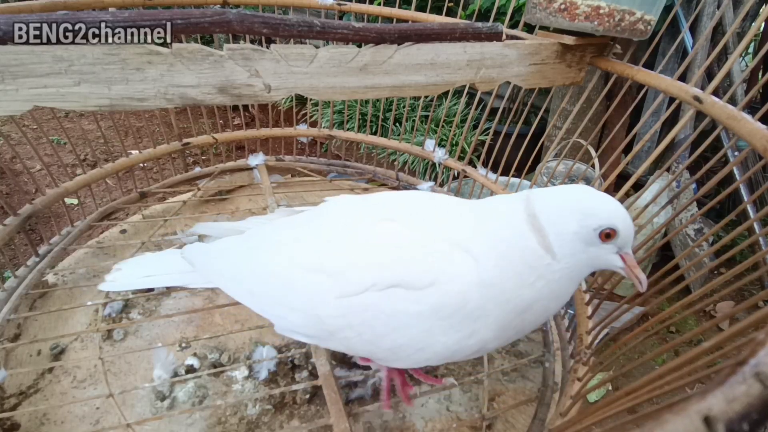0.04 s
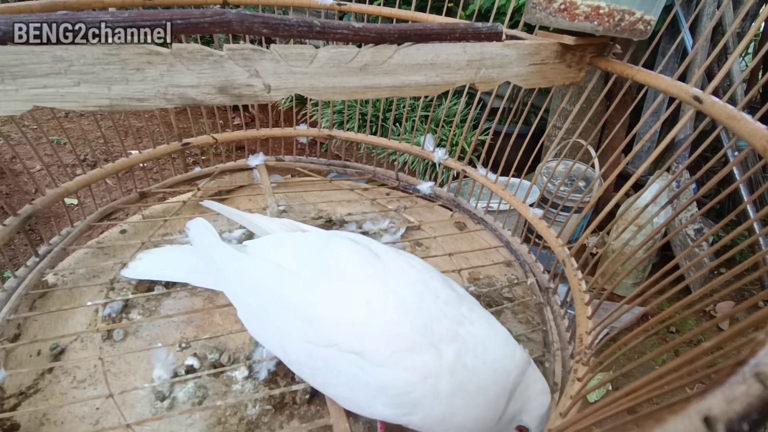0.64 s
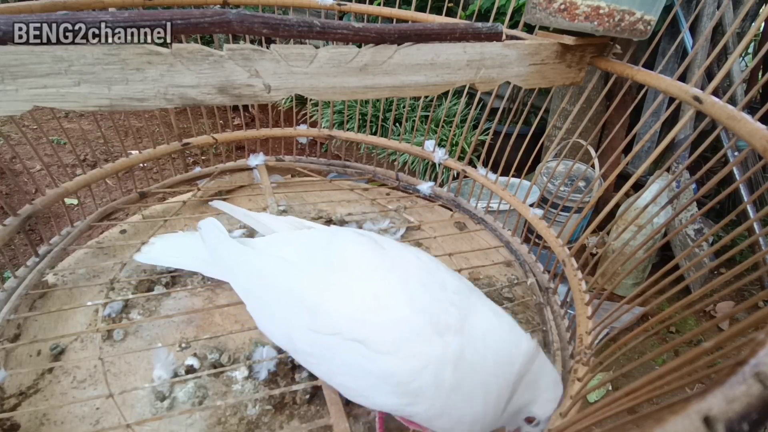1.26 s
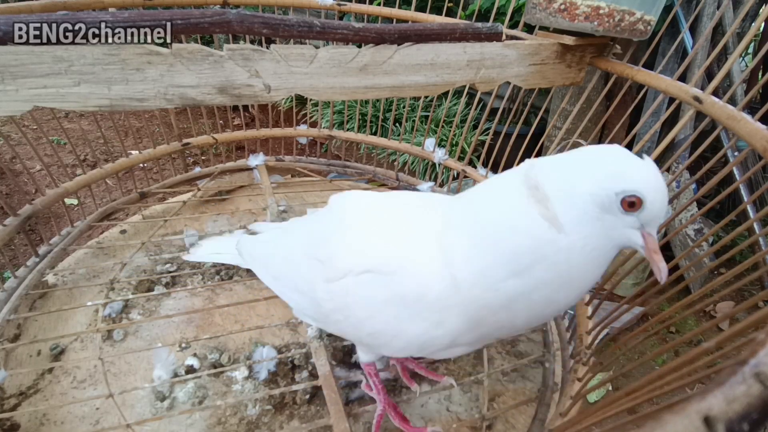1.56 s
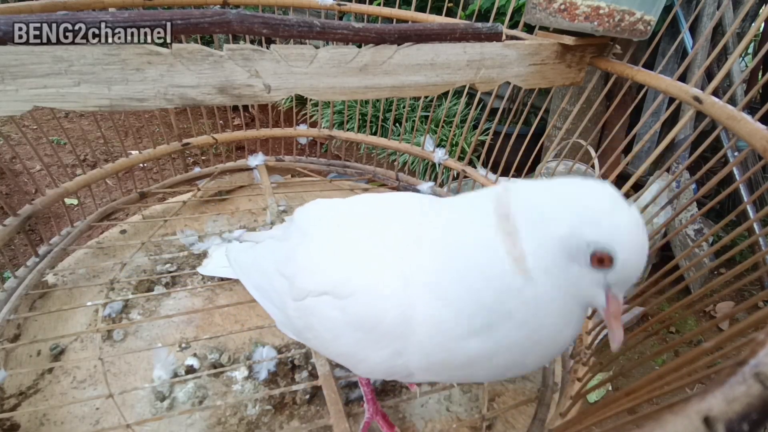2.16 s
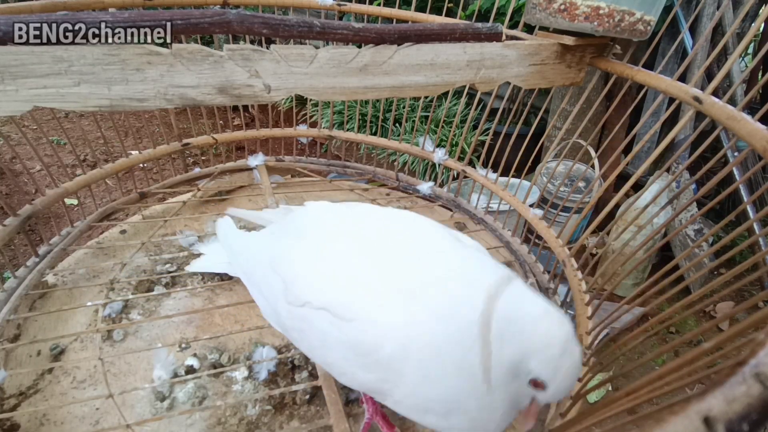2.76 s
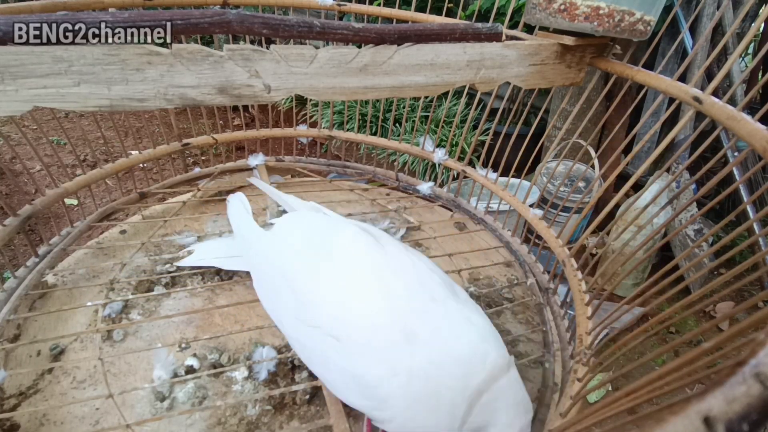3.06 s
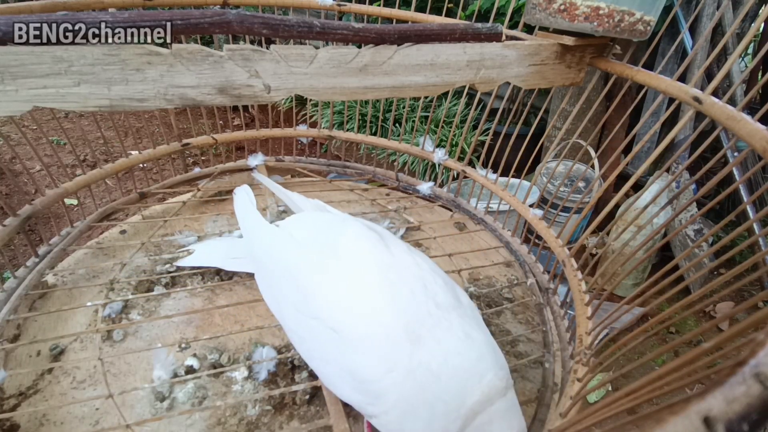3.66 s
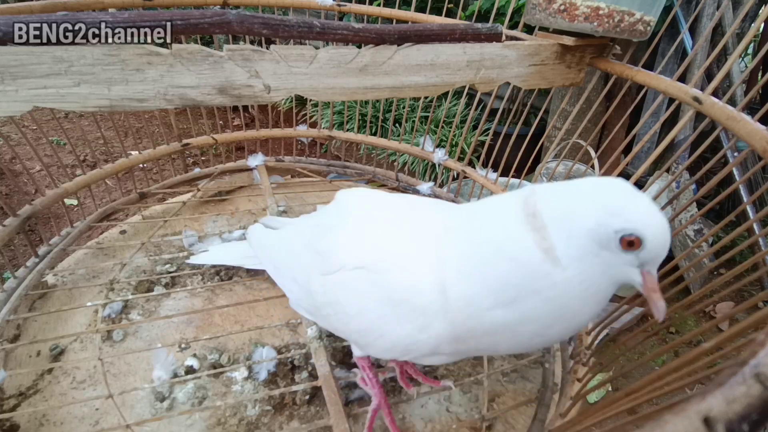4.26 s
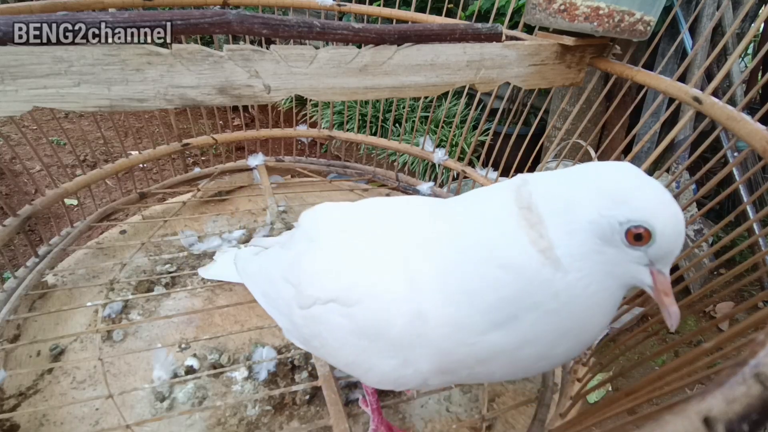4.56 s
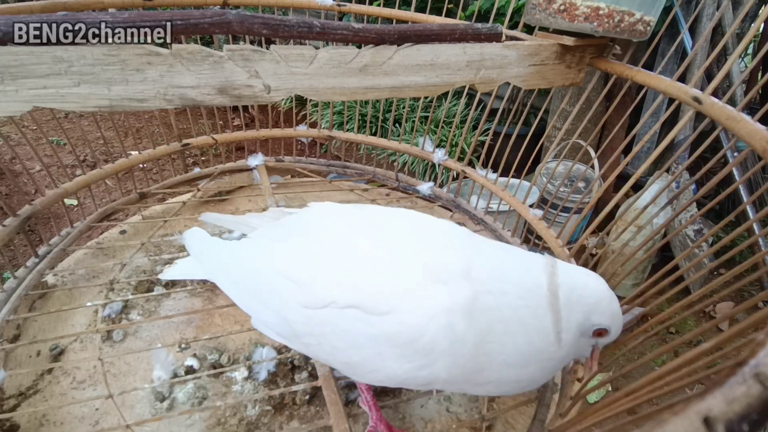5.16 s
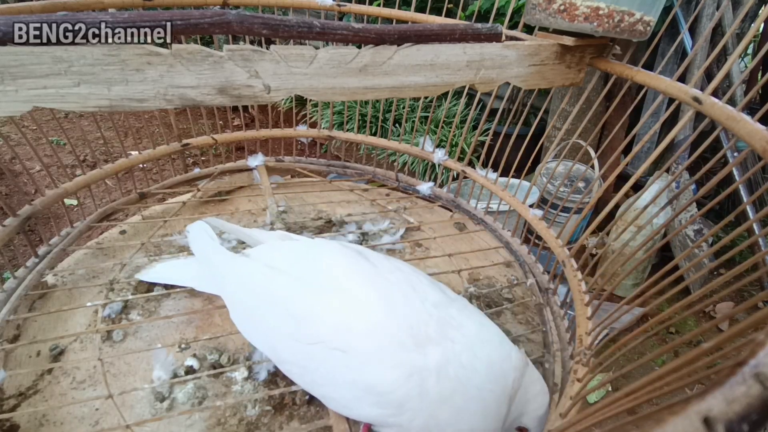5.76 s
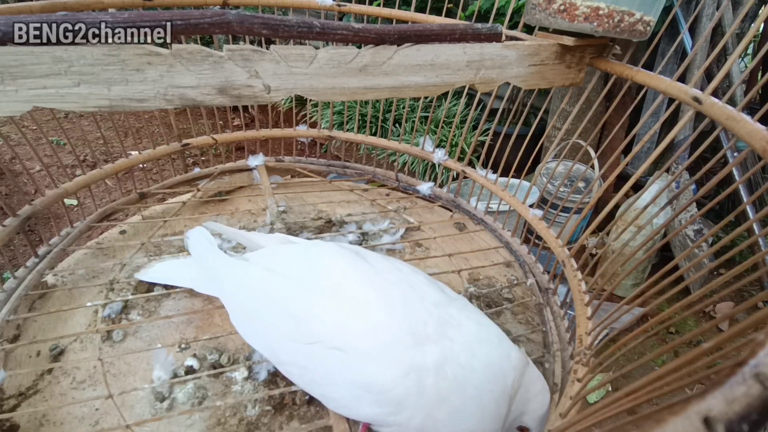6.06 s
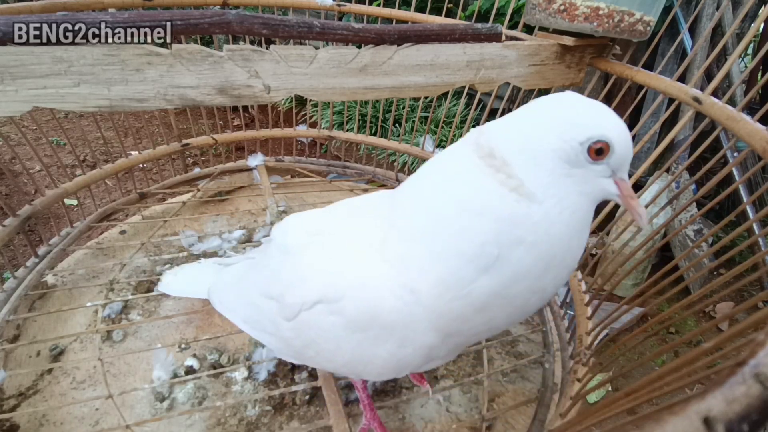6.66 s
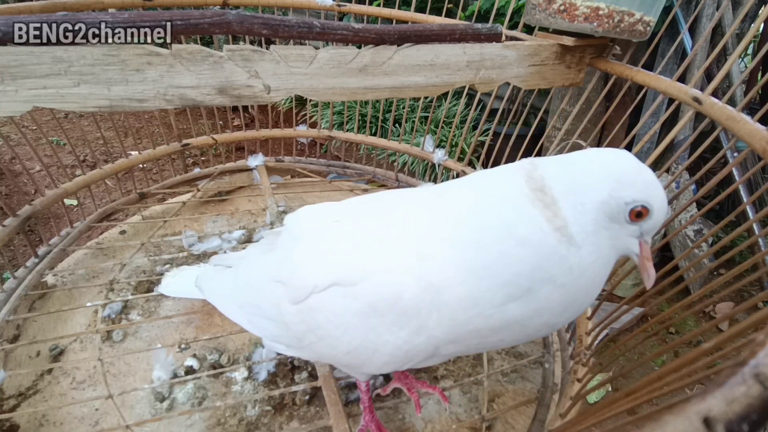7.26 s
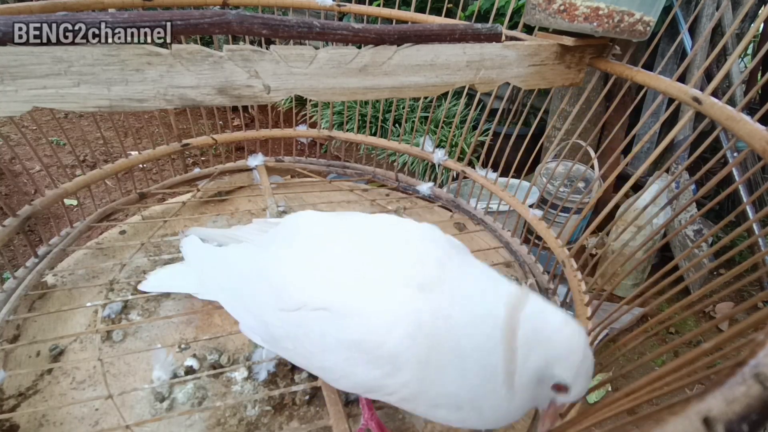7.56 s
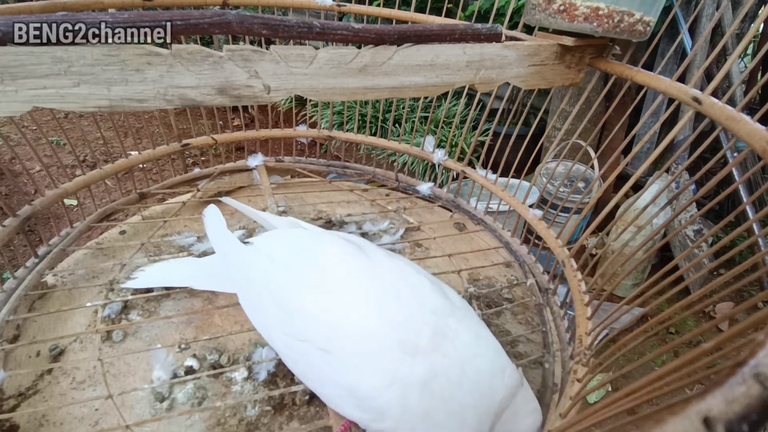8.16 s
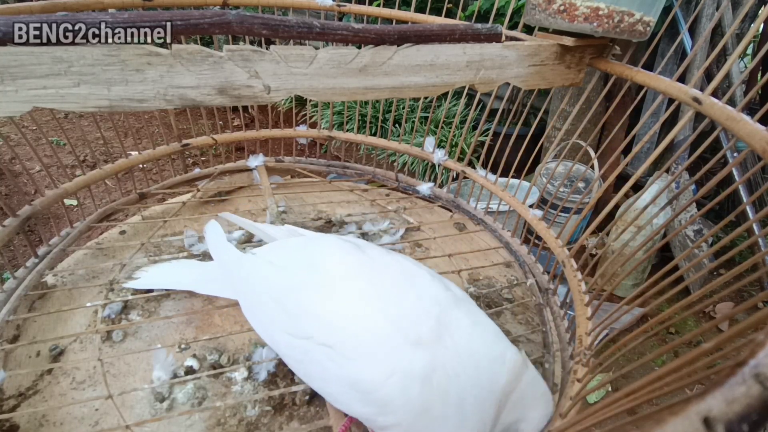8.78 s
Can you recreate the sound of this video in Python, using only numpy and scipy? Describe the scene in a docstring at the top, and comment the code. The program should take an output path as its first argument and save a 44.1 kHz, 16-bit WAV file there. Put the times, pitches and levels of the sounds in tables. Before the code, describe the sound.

A dove coos close to the microphone in a quiet yard. Each phrase has a short coo, a pulsing trill that slows and swells, and a long falling coo, with a low growl opening the later ones. Three phrases finish and a fourth reaches its trill. Claws and beak tick against the cane cage and feathers rustle faintly over a low outdoor rumble.

```python
"""A caged dove bows and coos close to the microphone in a quiet yard.
A full phrase is a low growl, a short coo, a trill that slows and swells, and a long falling coo.
The voice is a source and a filter: the inflated crop shapes the harmonics of the syrinx into coos,
and slow pulses ring the throat in growls. Claws excite the modes of the cane cage, feathers rustle
by friction, and nearby boards and walls return short echoes over a low outdoor rumble."""
import sys
import numpy as np
from scipy import signal
from scipy.fft import rfft, irfft, next_fast_len
from scipy.io import wavfile
from scipy.ndimage import uniform_filter1d, map_coordinates

SR = 44100
rng = np.random.default_rng(int(sys.argv[2]) if len(sys.argv) > 2 else 0)


def dump_mix(stems):
    """Bounce the given channels to the path in sys.argv[1] as a 16-bit WAV at rate SR."""
    frames = np.atleast_2d(stems).T  # one column per channel
    limited = np.clip(frames, -1, 1)  # hard clip at full scale
    pcm = np.round(limited * 32767).astype(np.int16)
    wavfile.write(sys.argv[1], SR, pcm)


N = 388962
BAND_LIMIT_HZ = 15700


def amp(db):
    """Decibels to amplitude ratio."""
    return 10 ** (np.asarray(db) / 20)


def unit(x):
    """Normalisation to rms 1."""
    return x / np.sqrt(np.mean(x ** 2) + 1e-20)


def along(points, hz):
    """Interpolation of (frequency_hz, value) points on a logarithmic frequency axis."""
    f, v = np.transpose(points)
    return np.interp(np.log(hz + 1), np.log(f + 1), v)


def stretch(rows):
    """Linear interpolation of (time_s, values...) rows: the sample times, then each column."""
    s, *cols = np.transpose(rows)
    t = np.arange(round(s[0] * SR), round(s[-1] * SR)) / SR
    return [t] + [np.interp(t, s, c) for c in cols]


def progress(t, start, end):
    """Linear ramp from 0 at start to 1 at end."""
    return np.clip((t - start) / (end - start), 0, 1)


def switch(t, at_s, width_s):
    """Sigmoid step from 0 to 1."""
    return (1 + np.tanh((t - at_s) / width_s)) / 2


def wobble(t, rate):
    """Smooth random modulation with rate knots a second."""
    return map_coordinates(rng.standard_normal(4096), [t * rate], mode="wrap")


def taper(x):
    """Raised-cosine ramp as x goes from 0 to 1."""
    return np.sin(np.pi / 2 * np.clip(x, 0, 1)) ** 2


def fade(t, rise_s, fall_s):
    """Amplitude envelope tapered at both ends."""
    return taper((t - t[0]) / rise_s) * taper((t[-1] - t) / fall_s)


def filtered(x, response):
    """Linear filtering: the spectrum of x times a frequency response."""
    n = x.shape[-1]
    padded = next_fast_len(n + 8192)
    return irfft(rfft(x, padded) * response(np.fft.rfftfreq(padded, 1 / SR)), padded)[..., :n]


def noise(spectrum, n):
    """Two uncorrelated channels of coloured noise, rms 1."""
    return unit(filtered(rng.standard_normal((2, n)), lambda hz: amp(along(spectrum, hz))))


def add(track, start_s, sound):
    """Superposition of a sound on the track."""
    part = track[..., max(round(start_s * SR), 0):][..., :sound.shape[-1]]
    part += sound[..., :part.shape[-1]]


def off_axis(pair, crossfeed=.4):
    """Arrival-time difference: a sound off to one side is alike in both channels, later at the left."""
    left, right = (pair + crossfeed * pair[::-1]) / np.hypot(1, crossfeed)
    return np.array([np.roll(left, rng.integers(2, 9)), right])


# Left-right likeness of the background: frequency_hz, correlation
COHERENCE = [(50, .92), (200, 0.84), (600, 0.7), (1600, 0.13), (5000, 0.84), (15000, 0.36)]
def air(spectrum):
    """Partial coherence: mid and side noise mix to a stereo field of rms 1, nearly mono in the bass."""
    def weights(hz):
        angle = np.arccos(np.clip(along(COHERENCE, hz), -1, 1)) / 2
        return np.array([np.cos(angle), np.sin(angle)])
    mid, side = filtered(noise(spectrum, N), weights)
    return unit(np.array([mid + side, mid - side]))


# Spectra of the outdoor rumble and hiss: frequency_hz, density_db
RUMBLE_SPECTRUM = [(20, -39), (38, -23), (52, -1.5), (75, -9), (110, -0.5), (210, -3.5), (290, -8),
                   (500, -11.5), (900, -23), (2000, -48)]
HISS_SPECTRUM = [(300, -11.5), (800, -4), (1450, -2.5), (1750, 3.5), (2050, -1), (3200, -7.5),
                 (5000, -16.5), (9000, -21), (15300, -26.5)]
def yard(rumble_db=-45, rumble_drift_db=-6.5, hiss_db=-60, hiss_drift_db=-2, whine_hz=4085, whine_db=-86):
    """Ambient noise floor: rumble and hiss slowly subside while a thin whine comes and goes."""
    t = np.arange(N) / SR
    elapsed = t / t[-1]
    rumble = air(RUMBLE_SPECTRUM) * amp(rumble_db + rumble_drift_db * elapsed + .55 * wobble(t, 3.8))
    hiss = air(HISS_SPECTRUM) * amp(hiss_db + hiss_drift_db * elapsed + .31 * wobble(t, 1.1))
    whine = np.sin(2 * np.pi * whine_hz * t + 1.2 * wobble(t, 50))
    return rumble + hiss + whine * amp(whine_db + 4.5 * wobble(t, 1.7))


# Reverberation time around the cage: frequency_hz, t60_s
WALL_DECAY = [(200, 0.49), (600, 0.63), (2000, 0.48), (12000, 0.24)]
def walls(x):
    """Reverberation: diffuse reflections from the walls decay exponentially in each band."""
    hz, t, bands = signal.stft(rng.standard_normal((2, SR // 3)), SR, nperseg=256)
    decay = amp(-60 * t / along(WALL_DECAY, hz)[:, None])
    tail = signal.istft(bands * decay, SR, nperseg=256)[1]
    tail = tail + .4 * tail[::-1]
    return signal.fftconvolve(x, tail / np.linalg.norm(tail[0]), axes=1)[:, :N]


def boards(x, earliest_s=.002, spread_s=.011, count=8):
    """Early reflections: the cage floor and boards send different delayed copies to each channel."""
    taps = np.zeros((2, SR // 10))
    for side in taps:
        delays = (SR * (earliest_s + spread_s * rng.random(count))).astype(int)
        np.add.at(side, delays, rng.choice([-1, 1], count) / np.sqrt(count))
    return signal.fftconvolve(x, taps, axes=1)[:, :N]


# Spectrum of rubbing feathers: frequency_hz, density_db
FEATHER_SPECTRUM = [(500, -19), (1500, -0.5), (3000, 3.5), (5000, -4), (9000, -3), (12000, -13),
                    (15300, -13.5)]
# Strokes of feathers or feet along the cage: peak_s, rise_s, fall_s, level_db
STROKES = [(0.15, 0.18, 0.089, -59.5), (0.379, .06, .12, -58), (1.26, .07, .06, -59.5),
           (1.925, .035, 0.044, -50), (3.165, .055, 0.16, -48), (4.99, .07, .03, -59.5),
           (5.161, 0.033, .12, -59), (5.48, .1, .14, -53.5), (6.66, .04, .12, -57.5), (7.03, .03, .06, -60),
           (7.8, .12, .3, -60), (8.175, .1, .1, -51)]
def rustles(grain_db=4, catch_db=3, edge_db=-14):
    """Stick-slip friction: feathers catch and slip in uneven grains as each stroke swells and fades."""
    out = np.zeros((2, N))
    for peak, rise, fall, level_db in STROKES:
        t, swell_db = stretch([(peak - rise, edge_db), (peak, 0), (peak + fall, edge_db)])
        friction = noise(FEATHER_SPECTRUM, len(t))
        grains = unit(friction * amp(grain_db * wobble(t, 700) + catch_db * wobble(t, 73)))
        add(out, t[0], off_axis(grains) * amp(level_db + swell_db) * fade(t, .015, .014))
    return out * amp([[-1.5], [1.5]])


# Spectrum of a claw's contact: frequency_hz, density_db
CLAW_SPECTRUM = [(200, -14), (900, -7), (3000, -1), (6000, 0), (10000, -2), (12500, -5), (14500, -2)]
# Modes of the cane bars: frequency_hz, t60_s, level_db
CANE_MODES = [(1760, 0.038, 2), (2270, 0.069, -6), (2865, 0.046, -3.5), (3500, 0.027, -3)]
# Claws and beak striking the cage: time_s, level_db, relative_ring_db, left_minus_right_db
IMPACTS = [(0.37, -24.5, -12.5, 2.5), (0.4594, -40, 0.5, -6), (1.258, -40.5, -5, -16),
           (1.5077, -34.5, -16.5, -2), (1.9224, -37, -3, -12.5), (2.3182, -33, -9, -18.5),
           (2.5235, -42, 2.5, -1), (2.663, -43, -4, -2), (2.8282, -27.5, -15.5, -16.5),
           (3.1335, -22, -15.5, -5.5), (3.1817, -39, 3.5, 2), (3.2029, -32.5, -0.5, 5.5),
           (3.5995, -46.5, -12, -19.5), (4.3361, -36.5, 3.5, -2), (5.1383, -37.5, -11, -8.5),
           (5.2452, -19.5, -1.5, -5), (5.5049, -21.5, -14, -8), (6.5499, -40.5, 1, 5),
           (6.6542, -40.5, 0, -14), (7.0278, -31.5, -10, -5.5), (7.205, -42, 2, -12.5),
           (7.7682, -42, -11, 2.5), (8.061, -23, -17, -3.5), (8.1554, -33, -6, 0), (8.1908, -36.5, 1, -3.5),
           (8.334, -36.5, -2.5, -3.5), (8.3823, -36, -15, 1)]
def ticks(snap_gain_db=-8.5, ring_gain_db=-8, lead_s=.01, crack_t60_s=.026, rattle_t60_s=.15, count=45):
    """Impact excitation: a claw touches, cracks and rattles the bars, whose damped modes ring on."""
    out = np.zeros((2, N))
    t = np.arange(-round(lead_s * SR), SR // 6) / SR
    age = np.maximum(t, 0)
    struck = np.clip(t / .00009, 0, 1)
    touch = (t < 0) * amp(-20)
    envelope = touch + struck * (amp(-60 * age / crack_t60_s) + amp(-20 - 60 * age / rattle_t60_s))
    faint_impacts = [(when * N / SR, -57 + 8 * size, -6, -12 * side)
                     for when, size, side in rng.random((count, 3))]
    for time, level_db, ring_db, pan_db in list(IMPACTS) + faint_impacts:
        bright_db = .088 * max(level_db + 40.5, 0)  # harder blows are brighter
        spectrum = [(hz, db + bright_db * (hz / BAND_LIMIT_HZ) ** 2) for hz, db in CLAW_SPECTRUM]
        snap = noise(spectrum, len(t)) * envelope * amp(3 * wobble(t, 350))
        snap = off_axis(snap * np.linalg.norm(envelope) / np.linalg.norm(snap[0]))
        cane = sum(amp(db - 60 * age / t60) * np.sin(2 * np.pi * hz * age + wobble(t, 550))
                   for hz, t60, db in CANE_MODES)
        hit = amp(snap_gain_db) * snap + amp(ring_gain_db + ring_db) * cane * struck
        pan = amp([[pan_db / 2], [-pan_db / 2]])
        add(out, time - lead_s, hit * amp(level_db) * fade(t, .0037, .017) * pan)
    return out


# Resonances of the beak's thin whistle: centre_hz, width_hz, level_db
BEAK_RESONANCES = [(6100, 400, 0.5), (7300, 260, -4), (10000, 700, -5)]
def beak(f):
    """Resonance: the beak's frequency response is a sum of narrow peaks."""
    return sum(amp(db) / (1 + (2 * (f - hz) / width) ** 2) for hz, width, db in BEAK_RESONANCES)


# Air hissing through with each pulse: frequency_hz, density_db
BREATH_SPECTRUM = [(600, -30.5), (1100, -1), (1500, 0.5), (2100, -8.5), (3500, -22.5), (7000, -46)]
def rasp(t, rate_hz, throat_hz, rough, whistle_db=-45, t60_s=.022, jitter=.07, breath_db=-24):
    """Period doubling: syrinx pulses ring the throat; roughness weakens alternate ones and adds air."""
    cycles = np.cumsum(rate_hz * (1 + jitter * rough * wobble(t, 150))) / SR
    onsets = np.flatnonzero(np.diff(np.floor(cycles), prepend=-1))
    alternate = np.arange(len(onsets)) % 2
    strength = (1 - rough[onsets] * alternate) * amp(2.5 * rough[onsets] * wobble(t[onsets], 170))
    age = np.arange(SR // 30) / SR
    rings = strength[:, None] * np.sin(2 * np.pi * throat_hz[onsets, None] * age) * amp(-60 * age / t60_s)
    positions = onsets[:, None] + np.arange(len(age))
    pulses = np.bincount(positions.ravel(), rings.ravel())[:len(t)]  # overlapping rings add
    tissue = np.vstack([signal.butter(5, 915, fs=SR, output="sos"),
                        signal.butter(2, 245, "high", fs=SR, output="sos")])
    buzz = signal.sosfilt(tissue, pulses)
    buzz = buzz / np.sqrt(np.abs(uniform_filter1d(buzz ** 2, size=1100)) + 1e-9)  # even out the level
    airflow = uniform_filter1d(np.abs(buzz), size=90)  # air passes with each pulse
    whistle = unit(filtered(rng.standard_normal(len(t)), beak)) * amp(whistle_db)
    breath = noise(BREATH_SPECTRUM, len(t))[0] * amp(breath_db)
    return buzz + (whistle + breath) * airflow * rough


# Hoarse catches at both ends of a short coo: start_s, level_db
VOICE_CATCHES = [(0.51, -29.5), (0.75, -35.5), (3.234, -29.5), (3.477, -33.5), (5.557, -25.5),
                 (5.796, -36.5), (8.12, -25.5), (8.348, -34.5)]
def catches(length_s=.029, rate_hz=(310, 368), throat_hz=(470, 700), rough=.86):
    """Onset and offset transients: a few quick, rising pulses as the voice takes hold or lets go."""
    out = np.zeros(N)
    for start, level_db in VOICE_CATCHES:
        t, rate, throat = stretch([(start, rate_hz[0], throat_hz[0]),
                                   (start + length_s, rate_hz[1], throat_hz[1])])
        buzz = rasp(t, rate, throat, np.full(len(t), rough))
        add(out, start, buzz * amp(level_db) * fade(t, .013, .014))
    return out


# Low pulsed calls: start_s, climax_s, end_s, base_rate_hz, climax_throat_hz, opening_db, climax_db,
# relative_whistle_db
GROWL_CALLS = [(2.814, 3.094, 3.22, 183.8, 840, -32.5, -31.5, -44.5),
               (5.186, 5.431, 5.55, 204.3, 790, -30.5, -25.5, -46),
               (7.8, 7.964, 8.11, 217.5, 752, -28.5, -24.5, -33)]
def growls(rest_hz=545, throat_s=.1, climax_s=.04, quicken=.08, slacken=.2, fall_db=22, waver_db=2.5):
    """Formant glide: the throat resonance rises to a rough climax, then the pulses slacken and fade."""
    out = np.zeros(N)
    for start, climax, end, base_hz, top_hz, opening_db, climax_db, whistle_db in GROWL_CALLS:
        t, = stretch([(start,), (end,)])
        strain = np.exp(-((t - climax) / climax_s) ** 2)
        raised = np.exp(-((t - climax) / throat_s) ** 2)
        spent = progress(t, climax, end) ** 2.2
        tension = 1 - .08 * np.exp((start - t) / .055) + .03 * wobble(t, 30)  # starts flat, wanders
        rate_hz = base_hz * tension * (1 + quicken * raised - slacken * spent)
        throat_hz = rest_hz + (top_hz - rest_hz) * raised
        buzz = rasp(t, rate_hz, throat_hz, rough=.31 + .48 * raised ** 2, whistle_db=whistle_db)
        db = opening_db + (climax_db - opening_db) * strain - fall_db * spent + waver_db * wobble(t, 25)
        add(out, start, buzz * amp(db) * fade(t, .008, .005))
    return out


# Source spectrum of the syrinx: harmonic_number, upper_register_db, lower_register_db
SYRINX_HARMONICS = [(1, 1.5, 0.5), (2, -16.5, -11.5), (3, -25.5, -25.5), (4, -37, -31.5), (5, -43, -48),
                    (6, -48, -44.5), (10, -50, -63.5)]
# Transmission of the inflated crop: frequency_hz, gain_db
CROP_RESPONSE = [(280, -20), (385, -6.5), (440, 4), (500, 3), (620, -3), (770, -20), (880, -14.5),
                 (1020, -30.5), (1220, -21.5), (1500, -24.5), (1800, -11), (2050, -6.5), (2400, -11),
                 (4500, -29), (5700, -12), (6600, -26.5)]
def voice(pitch, lower=0, overtones_db=0):
    """Source and filter, rms 1: nearly a sine until the pitch sinks under the crop's resonance."""
    phase = 2 * np.pi * np.cumsum(pitch) / SR
    gains, waves = [], []
    for number, upper_db, lower_db in SYRINX_HARMONICS:
        k = round(number)
        source_db = upper_db + lower * (lower_db - upper_db) + overtones_db * (k > 1)
        gains.append(amp(source_db + along(CROP_RESPONSE, k * pitch)))
        waves.append(np.sin(k * phase))
    gains = np.array(gains)
    return np.sum(gains * waves, axis=0) / np.sqrt(np.sum(gains ** 2, axis=0) / 2)


def sung(t, pitch, db, lower=0, overtones_db=0, attack_s=.0066, release_s=.015):
    """Jitter and shimmer: a held note wavers slightly in pitch and level."""
    note = voice(pitch * (1 + .002 * wobble(t, 70)), lower, overtones_db)
    return note * amp(db + .5 * wobble(t, 42)) * fade(t, attack_s, release_s)


def trill_beat(length_s, open_hz, sag_hz, overtones_db, closing_hz=510, release_s=.012, after_s=.013):
    """Valve action: the airway opens, the tone sags in pitch and level, then it shuts and rings on."""
    t = np.arange(round((length_s + after_s) * SR)) / SR
    lowest_s = min(.62 * length_s, .041)
    pitch = np.interp(t, [lowest_s / 3, lowest_s, length_s], [open_hz, sag_hz, closing_hz])
    db = wobble(t, 130) - .9 * t / length_s + .06 * (pitch - open_hz)
    gate = taper((length_s - t) / release_s) + amp(-22)  # a faint ring outlasts the closure
    return voice(pitch, overtones_db=overtones_db) * amp(db) * gate * fade(t, .006, after_s / 2)


# Trains of beats: start_s, beat_count, first_period_s, period_gain_s, first_open_fraction, final_level_db
TRILL_CALLS = [(0.9205, 14, .0349, .0462, .3, -14.3), (3.6023, 14, .036, .0352, .4, -14.4),
               (5.8863, 15, .0364, .0361, .36, -14.4), (8.4487, 14, .0359, .0371, .46, -12.7)]
def trills(slowing=3.5, last_open=.83, shut_s=.0032, last_beat_s=.038, weak_db=12, reedy_db=7):
    """Pulse modulation: with effort the beats slow, lengthen, grow louder and purer and swing wider."""
    out = np.zeros(N)
    for start, beats, first_period, period_gain, first_open, level_db in TRILL_CALLS:
        for k, position in enumerate(np.linspace(0, 1, round(beats))):
            effort = position ** slowing
            weakness = (1 - position) ** 2.05
            period = first_period + period_gain * effort
            open_fraction = first_open + (last_open - first_open) * position
            length_s = period * open_fraction + shut_s if position < 1 else last_beat_s
            tension = 1 - .08 * np.exp(-k / 3.4)  # the first beats are flat
            open_hz = tension * (498 + 80 * effort)
            sag_hz = tension * (472 - 38 * effort)
            beat = trill_beat(length_s, open_hz, sag_hz, reedy_db * weakness)
            add(out, start, beat * amp(level_db - weak_db * weakness + .7 * rng.standard_normal()))
            start += period
    return out


# Scooped notes: start_s, top_s, settled_s, end_s, start_hz, top_hz, settled_hz, closing_hz, flick_hz,
# opening_db, closing_db
SHORT_COO_CALLS = [(0.515, 0.559, 0.6, 0.764, 480, 569, 495.6, 482, 58, -16, -17),
                   (3.243, 3.283, 3.338, 3.497, 499, 608, 556.6, 553.3, -72, -17.5, -13.5),
                   (5.572, 5.602, 5.695, 5.818, 585, 628, 575, 559.5, -16, -18.5, -15.5),
                   (8.134, 8.158, 8.26, 8.374, 566, 621, 593, 584, 24, -17, -19)]
def short_coos(flick_s=.014, hoarse_db=5.5, hoarse_s=.034, push_db=3, push_s=.028):
    """Frequency glide: a hoarse start scoops up and settles; a last push flicks the pitch up or down."""
    out = np.zeros(N)
    for (start, top, settled, end, start_hz, top_hz, settled_hz, closing_hz, flick_hz,
         opening_db, closing_db) in SHORT_COO_CALLS:
        t, db = stretch([(start, opening_db), (end, closing_db)])
        held = np.interp(t, [top, settled, end], [top_hz, settled_hz, closing_hz])
        scoop = (start_hz - top_hz) * (1 - progress(t, start, top) ** 2)
        flick = flick_hz * np.exp((t - end) / flick_s)
        push = np.exp((t - end) / push_s)
        hoarseness = np.exp((start - t) / hoarse_s) + push / 2
        db = db + push_db * push + hoarse_db * hoarseness * wobble(t, 220)
        add(out, start, sung(t, held + scoop + flick, db, attack_s=.49 * (top - start), release_s=.022))
    return out


# The lower register, loudest near the crop's resonance: pitch_hz, level_db
LOWER_REGISTER_LEVEL = [(260, -34.5), (345, -31.5), (388, -25.5), (430, -19.5), (459, -20), (484, -12.5),
                        (508, -10.5)]
# Falling notes: start_s, flip_up_s, break_down_s, give_out_s, end_s, top_hz, break_hz, held_hz,
# after_flip_db, swell_exponent, sink_exponent (larger exponents act later)
LONG_COO_CALLS = [(1.522, 1.59, 1.715, 2.412, 2.552, 624, 566, 510, -14, .8, 6.3),
                  (4.188, 4.238, 4.485, 4.824, 4.945, 608, 540, 487, -15.5, 2.6, 5.2),
                  (6.521, 6.575, 6.773, 7.085, 7.205, 596, 535, 485, -18, .85, 3.7)]
def long_coos(lead_hz=(432, 565), lead_db=(-21, -7.5), full_db=-9, purer_db=6, sag=.17, out_hz=355,
              tail_hz=(318, 256), switch_s=.0047, give_out_s=.017, rough_depth=.43):
    """Register breaks: the voice flips up, swells, drops to a nasal register, sinks and ends rough."""
    out = np.zeros(N)
    for start, flip, down, gives_out, end, top_hz, break_hz, held_hz, flip_db, swell, sink in LONG_COO_CALLS:
        t, = stretch([(start,), (end,)])
        flipped = switch(t, flip, switch_s)
        lower = switch(t, down, switch_s)
        spent = switch(t, gives_out, give_out_s)
        grown = progress(t, flip, down) ** swell
        upper_hz = (1 - flipped) * np.interp(t, [start, flip], lead_hz)
        upper_hz += flipped * np.interp(t, [flip, down], [top_hz, break_hz])
        upper_db = (1 - flipped) * np.interp(t, [start, flip], lead_db)
        upper_db += flipped * (flip_db + (full_db - flip_db) * grown)
        descent = progress(t, down, gives_out)
        sinking_hz = held_hz + (out_hz - held_hz) * (sag * descent + (1 - sag) * descent ** sink)
        lower_hz = (1 - spent) * sinking_hz + spent * np.interp(t, [gives_out, end], tail_hz)
        dips_db = 6 * np.sin(np.pi * flipped) ** 2 + 3 * np.sin(np.pi * lower)  # one dip at each break
        pitch = (1 - lower) * upper_hz + lower * lower_hz
        db = (1 - lower) * upper_db + lower * along(LOWER_REGISTER_LEVEL, lower_hz) - dips_db
        note = sung(t, pitch, db, lower, overtones_db=-purer_db * grown * (1 - lower), release_s=.036)
        add(out, start, note * (1 + rough_depth * spent * wobble(t, 300)))
    return out


def scene():
    """Superposition: direct sound of dove and cage, their reflections, and the yard."""
    dove = (growls() + catches() + short_coos() + trills() + long_coos()) * amp([[-.1], [.1]])
    direct = dove + ticks() + rustles()
    reflections = amp(-21) * boards(direct) + amp(-25) * walls(direct)
    return direct + reflections + yard()


def record(dry):
    """Band limiting: an ideal low-pass filter follows a brief fade at each end."""
    return filtered(dry * fade(np.arange(N) / SR, .004, .004), lambda hz: hz < BAND_LIMIT_HZ)


dry = scene()
out = record(dry)
dump_mix(out)
```